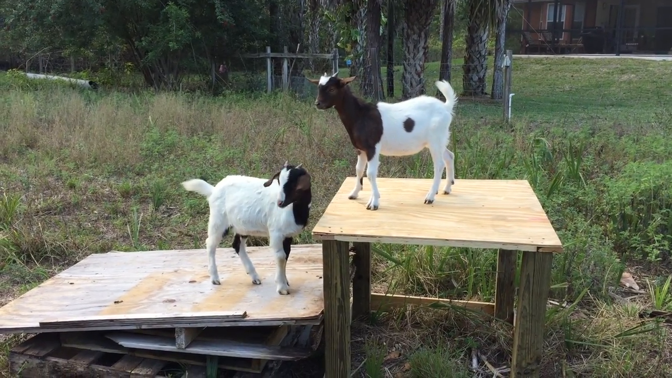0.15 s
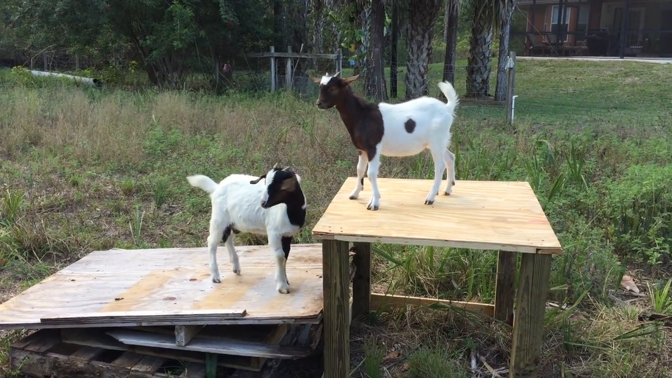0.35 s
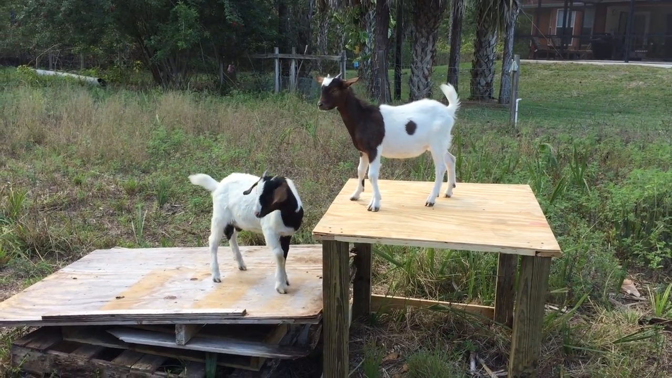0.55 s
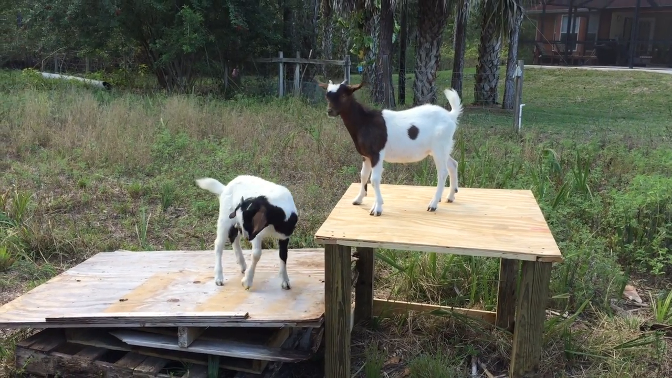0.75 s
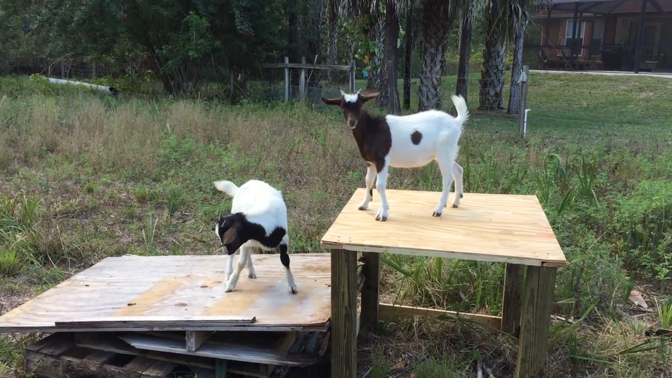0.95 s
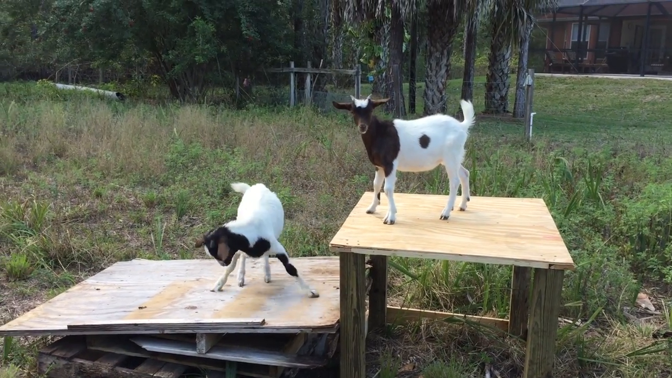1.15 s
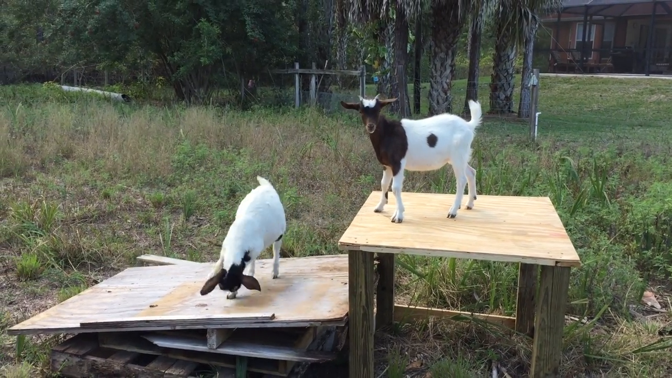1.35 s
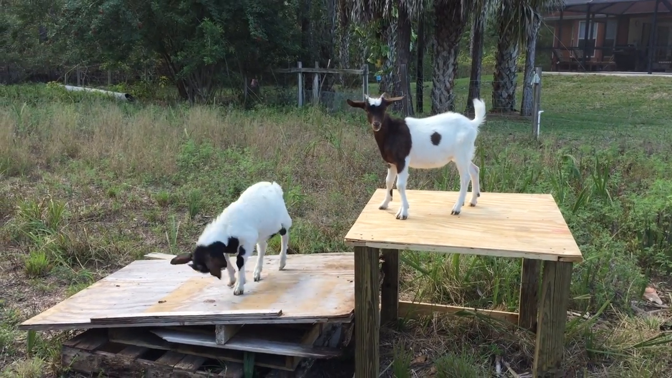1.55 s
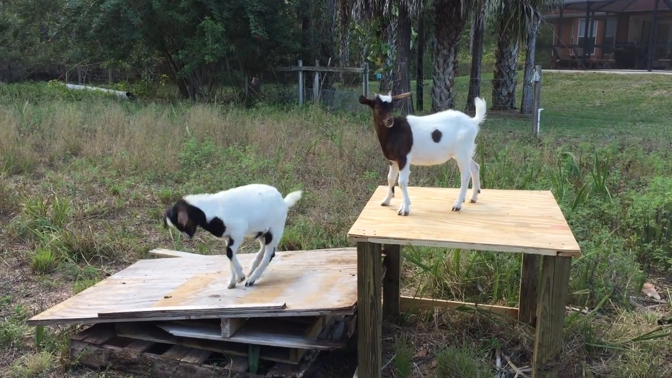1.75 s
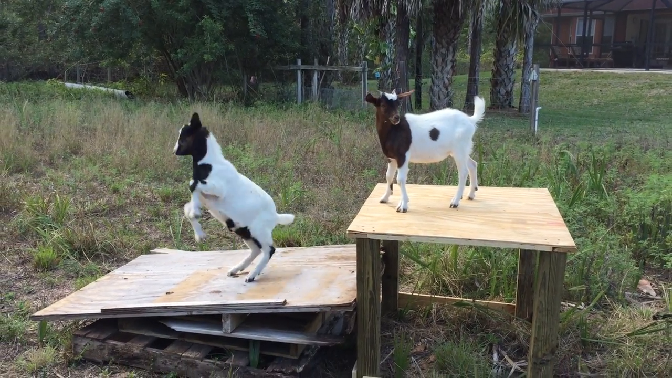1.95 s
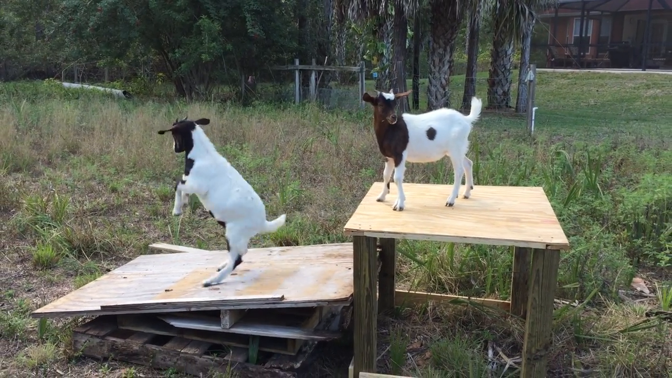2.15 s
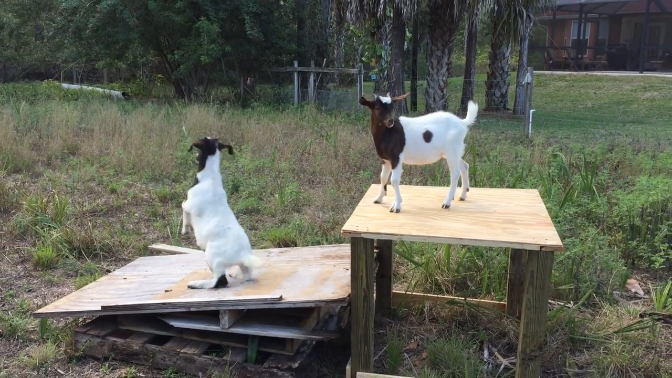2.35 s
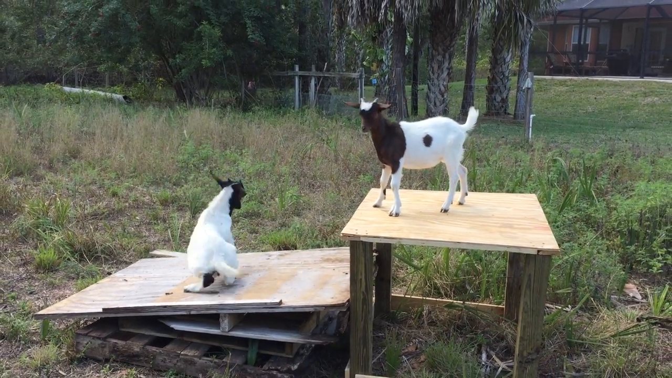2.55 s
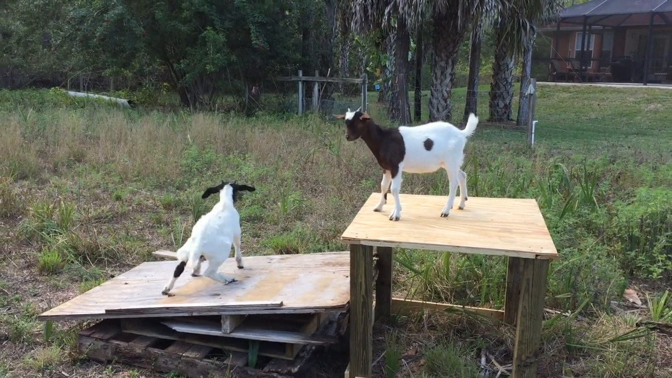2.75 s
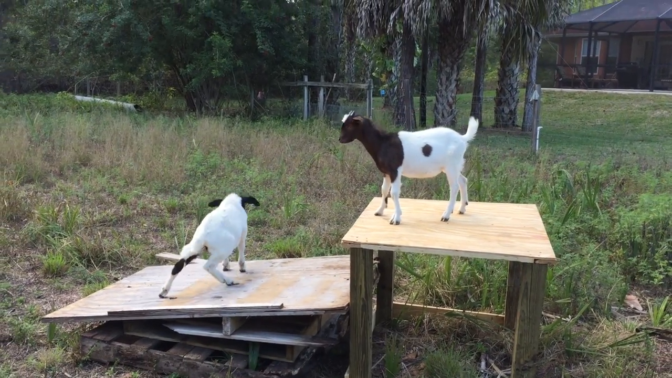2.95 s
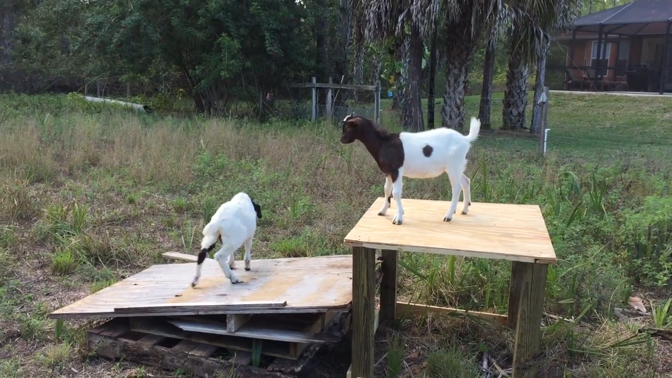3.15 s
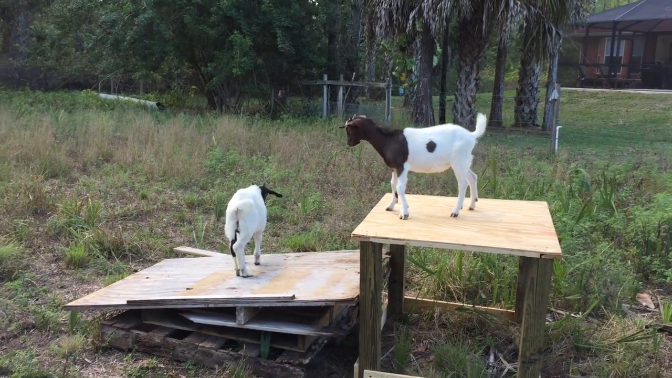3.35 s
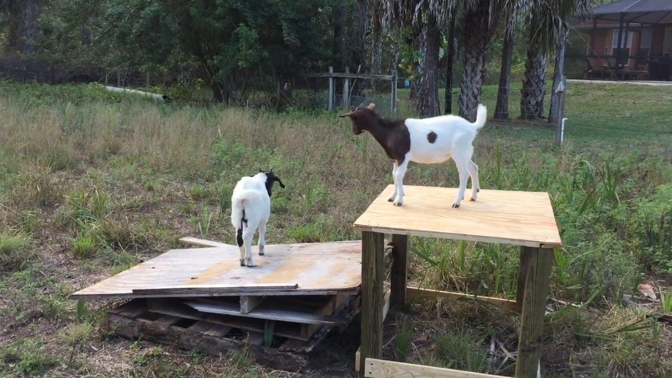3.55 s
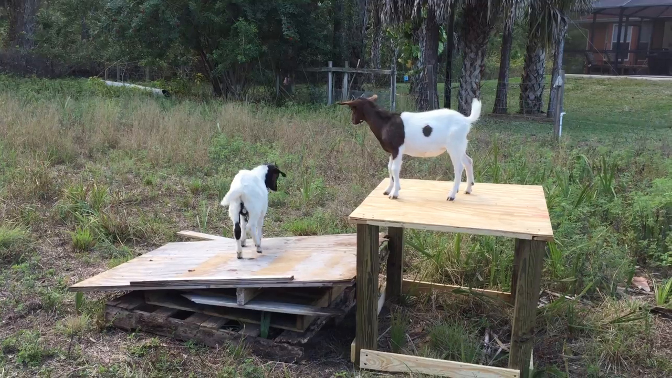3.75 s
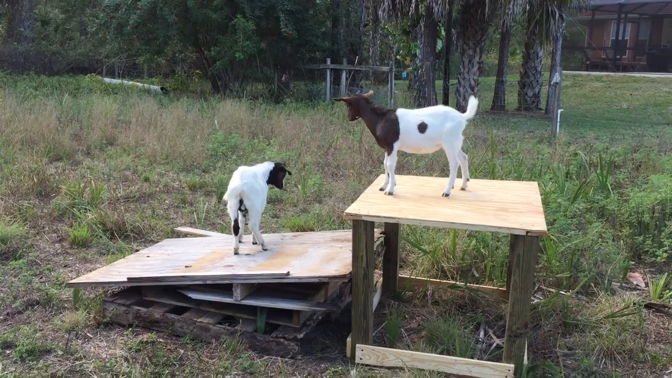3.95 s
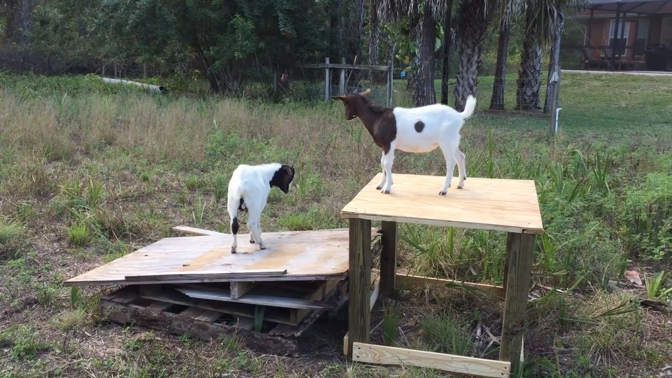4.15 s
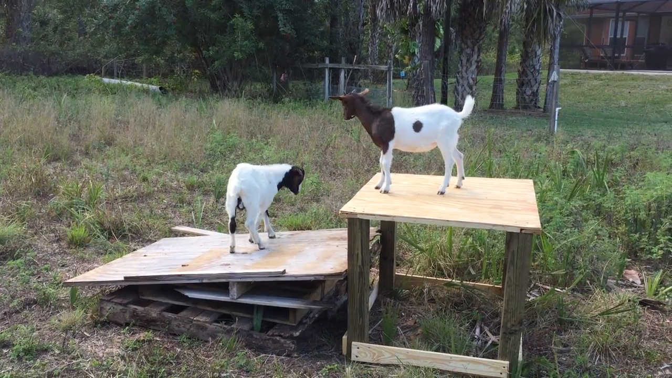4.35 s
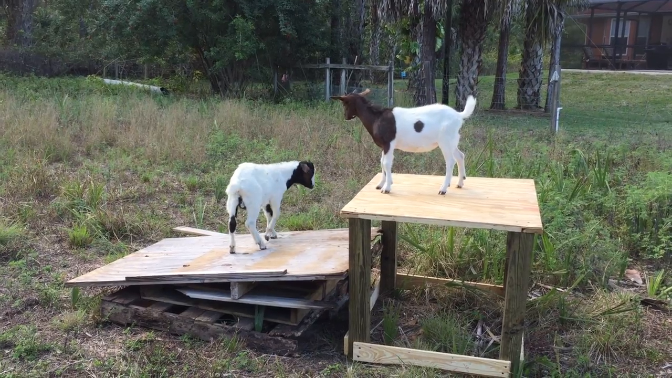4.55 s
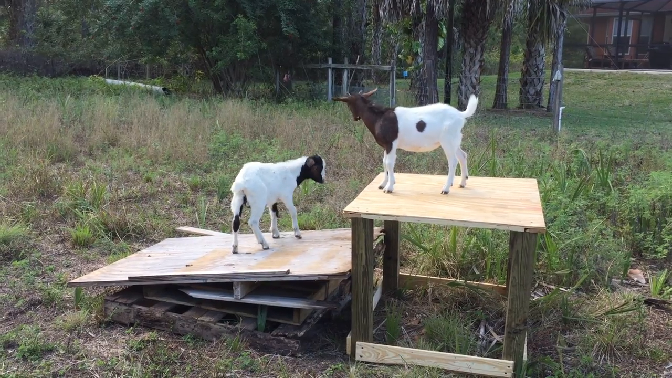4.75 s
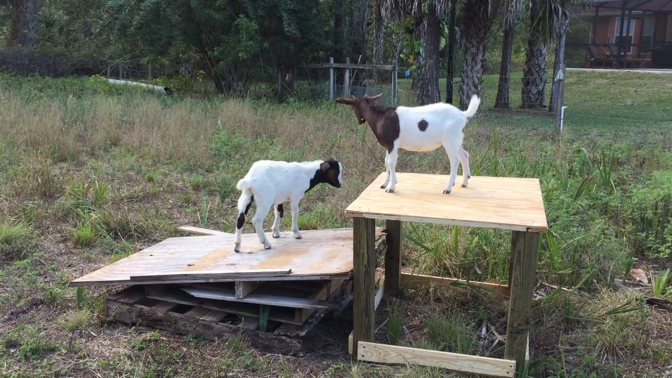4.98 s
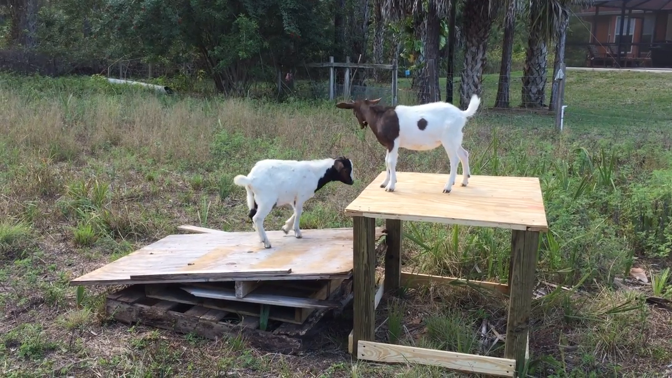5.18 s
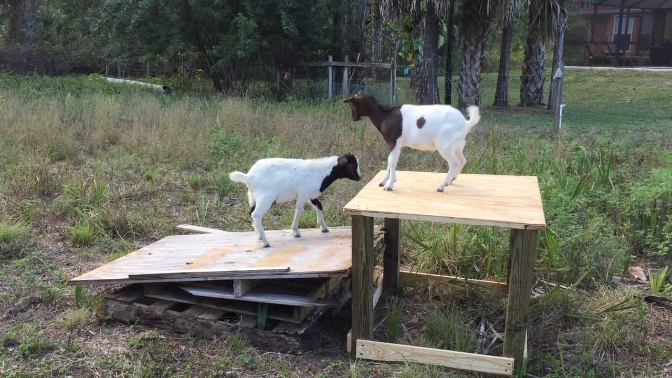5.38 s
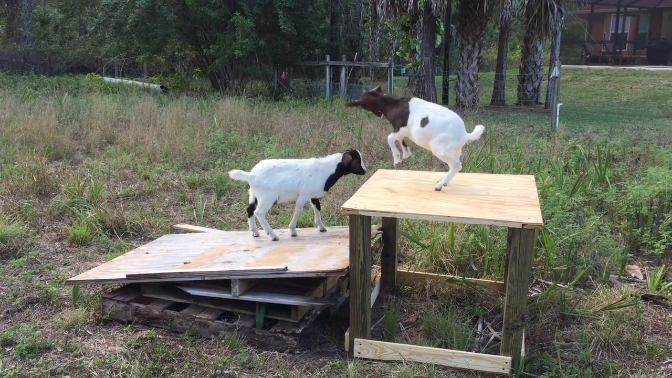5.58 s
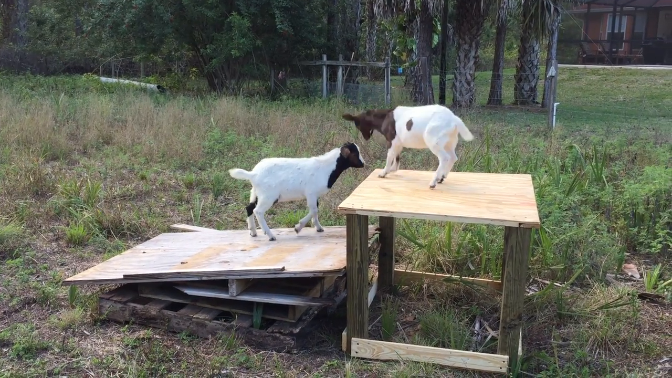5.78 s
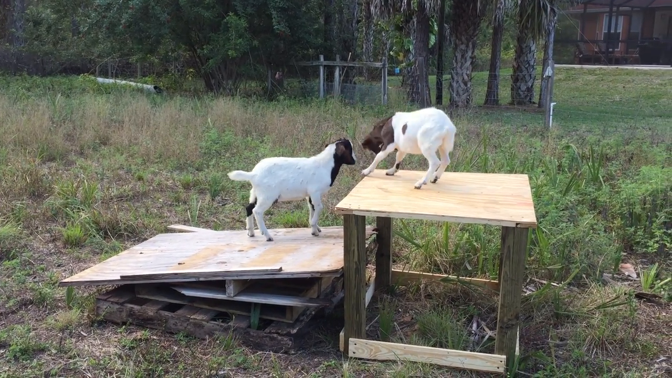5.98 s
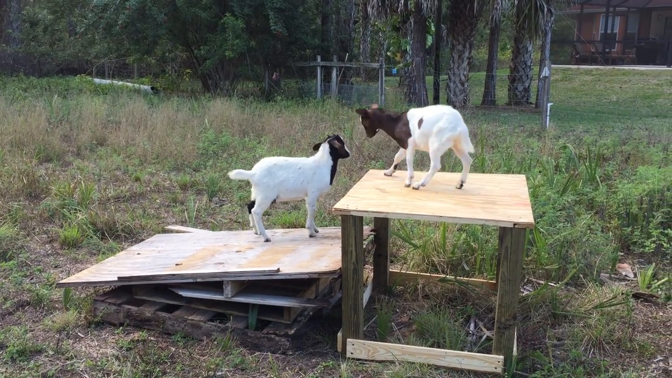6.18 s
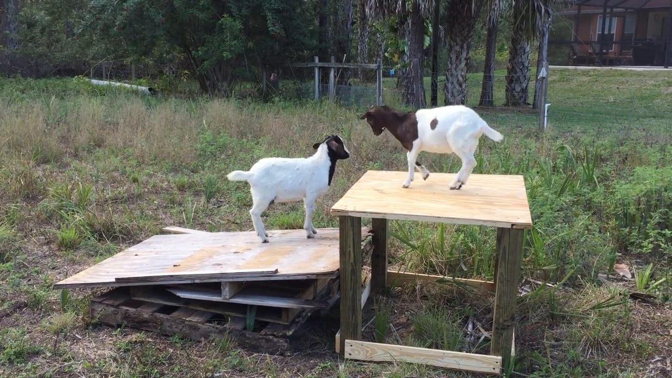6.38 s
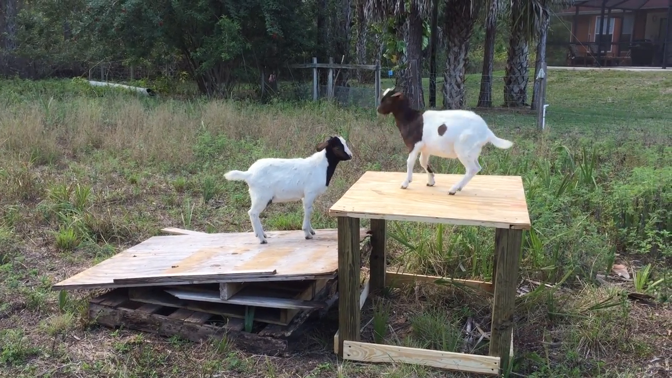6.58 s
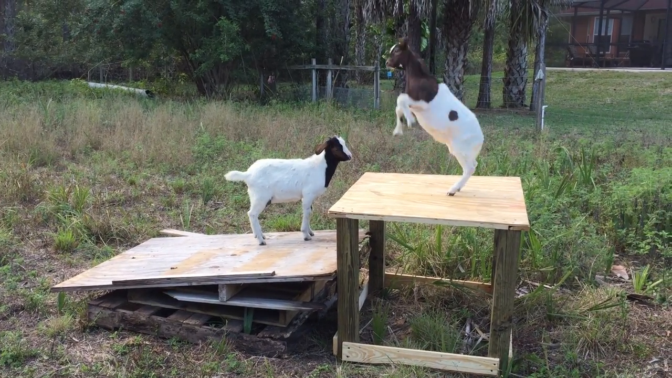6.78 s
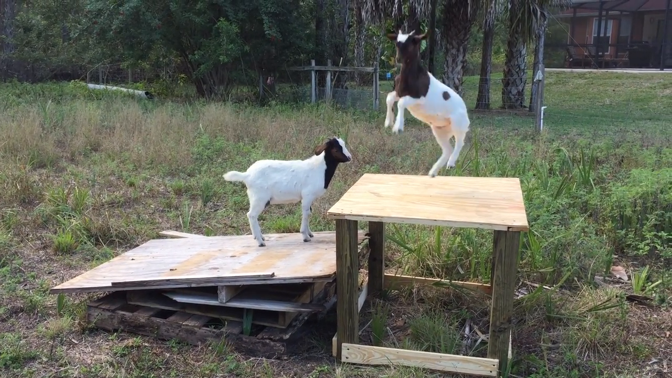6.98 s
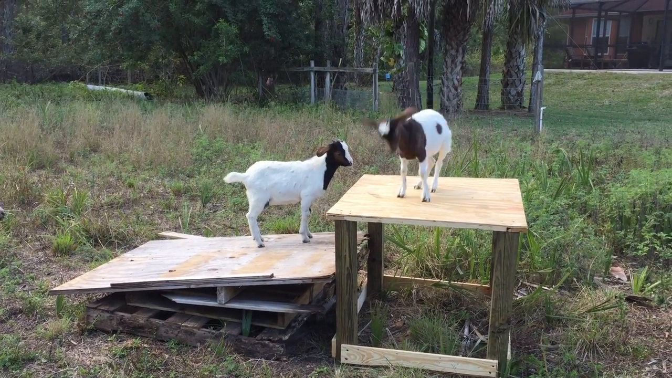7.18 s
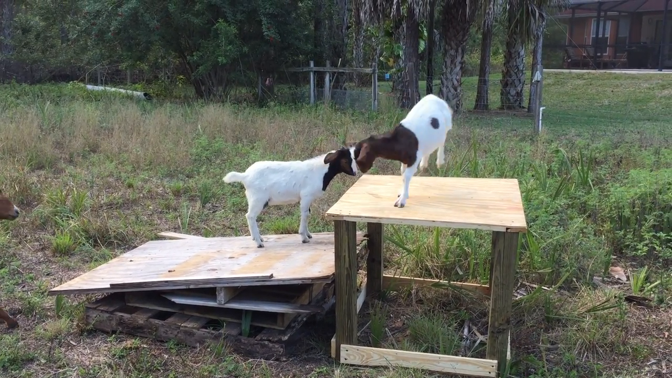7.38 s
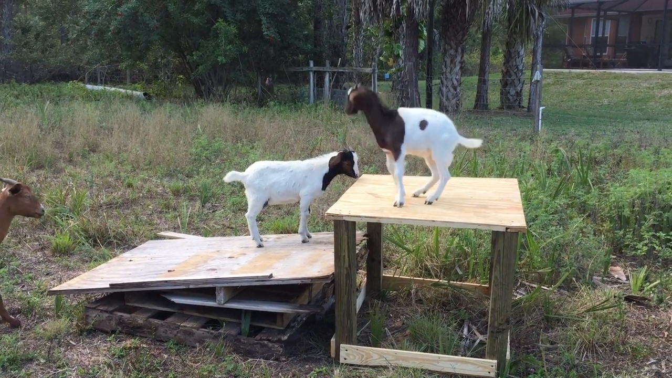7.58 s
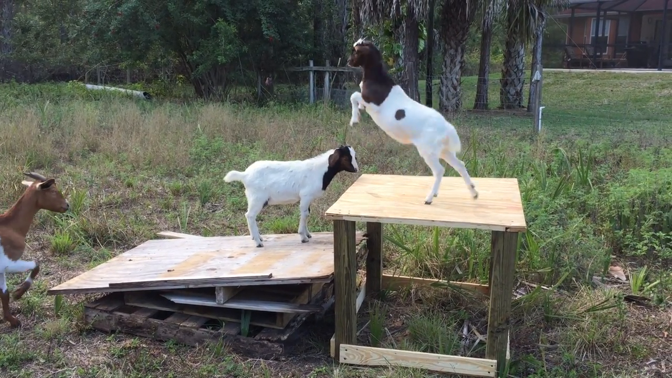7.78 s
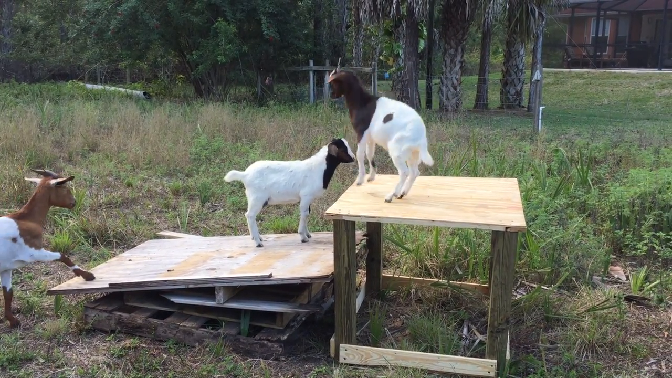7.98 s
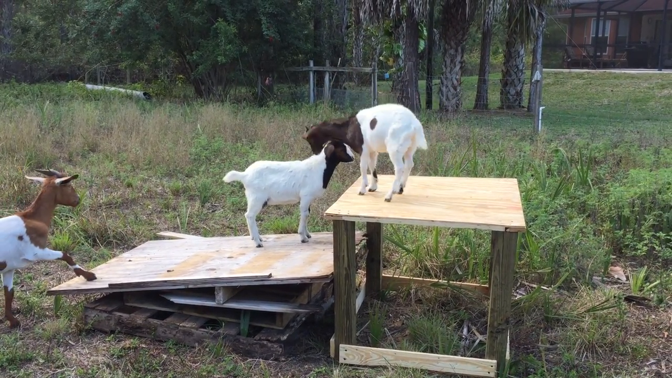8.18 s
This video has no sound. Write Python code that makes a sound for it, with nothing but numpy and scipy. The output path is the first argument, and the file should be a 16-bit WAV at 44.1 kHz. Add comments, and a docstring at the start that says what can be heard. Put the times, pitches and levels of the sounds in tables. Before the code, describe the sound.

Young goats move on plywood nearby, outdoors, over a faint hush and low rumble. Light hoof scuffs and ticks begin around 0.4 seconds, growing into rasping skids and knocks between 1 and 2 seconds. A distant dog barks once near 2 seconds. Sharp, gritty clicks at 2.2 seconds open a loud scramble lasting until about 3.1: hooves knock and scrape while a loose sheet thumps and slaps dully on pallets. Sparse, soft steps and scuffs follow, with a very faint bird whistling just after 5 seconds. From 5.4 seconds a second goat scrapes and stamps on a wooden table, with sharper cracks and hollow thumps clustered around 6 seconds. The far dog gives a lower bark at 6.3 seconds. More knocks come at 6.6, a strong cluster around 7.3, a few more up to 7.7, and a last quick clatter just after 8 seconds.

```python
"""A grassy yard, where two young goats play on plywood. One skids and scrambles on a loose sheet
laid over pallets; the other rears and stamps on a table. Each hoof clicks, knocks and makes its
board thump; skids rasp, grit and hoof edges tick and the loose sheet slaps. Far off, a dog barks
twice into the trees and a small bird calls, over a bed of outdoor hush and low rumble."""
import sys
import numpy as np
from scipy import signal
from scipy.fft import rfft, irfft, next_fast_len
from scipy.io import wavfile

SR = 44100
rng = np.random.default_rng(int(sys.argv[2]) if len(sys.argv) > 2 else 0)


def persist_wave(psi):
    """Save psi, clipped to +-1, as 16-bit WAV."""
    counts = np.round(np.clip(psi, -1, 1) * 32767).astype(np.int16)
    wavfile.write(sys.argv[1], SR, np.atleast_2d(counts).T)


N = 362943
TIME = np.arange(N) / SR
RING = np.arange(int(.45 * SR)) / SR  # time axis of one hit or skid
KNOCK_HZ, CLACK_HZ, CLICK_HZ, CUTOFF_HZ = 450, 1100, 2800, 15400  # band edges of the wood sounds


def from_db(db):
    """Decibels to gain."""
    return 10 ** (np.asarray(db) / 20)


def rms_one(x):
    """Scale to rms 1."""
    return x / np.sqrt(np.mean(x ** 2) + 1e-20)


def at_hz(points, hz):
    """Read a curve on a log-frequency axis."""
    points_hz, values = np.transpose(points)
    return np.interp(np.log(np.maximum(hz, 1)), np.log(points_hz), values)


def add(out, start_s, sound):
    """Mix a sound in at a given time."""
    i = int(start_s * SR)
    out[i:i + len(sound)] += sound[:N - i]


def band(x, low_hz, high_hz, order=2):
    """Causal band-pass."""
    edges_hz = [low_hz, min(high_hz, SR / 2 - 1000)]
    return signal.sosfilt(signal.butter(order, edges_hz, "band", fs=SR, output="sos"), x)


def coloured(x, spectrum):
    """Shape a steady sound with an EQ curve; rms 1."""
    size = next_fast_len(N)
    gain = from_db(at_hz(spectrum, np.fft.rfftfreq(size, 1 / SR)))
    return rms_one(irfft(rfft(x, size) * gain, size)[:N])


def drift(per_s):
    """Random modulation, gliding between values of spread 1."""
    knots = rng.standard_normal(4000)
    return np.interp(TIME * per_s, np.arange(len(knots)), knots)


def echoes(x, t60_s, build_s, low_hz, high_hz):
    """Diffuse scatter from trees and buildings: a noise tail with unit energy."""
    t = TIME[:2 * SR]
    noise = band(rng.standard_normal(len(t)), low_hz, high_hz)
    tail = noise * from_db(-60 * t / t60_s) * (1 - np.exp(-t / build_s))
    return signal.fftconvolve(x, tail / np.sqrt(np.sum(tail ** 2)))[:N]


# EQ of the outdoor hush: frequency_hz, gain_db
HUSH_EQ = [(25, -7), (65, -2.5), (95, 4.5), (140, -9.5), (280, -15), (900, -19), (2400, -23), (8000, -31)]
def outdoor_bed():
    """An even hush and a distant rumble that slowly swells and sinks."""
    rumble = from_db(-67 + 2 * drift(per_s=1.1)) * rms_one(band(rng.standard_normal(N), 60.4, 72.5))
    return from_db(-65.5) * coloured(rng.standard_normal(N), HUSH_EQ) + rumble


# bird whistles: start_s, length_s, end_pitch_hz, top_pitch_hz, level_db (before the flutter)
WHISTLES = [(5.07, .08, 2900, 3530, -80), (5.3, .018, 4200, 4350, -78), (5.375, .08, 2900, 3530, -78)]
def bird():
    """Thin whistles that arch up and back in pitch and flutter in level."""
    out = np.zeros(N)
    for start_s, length_s, end_hz, top_hz, level_db in WHISTLES:
        arch = np.sin(np.linspace(0, np.pi, int(length_s * SR)))
        phase = 2 * np.pi * np.cumsum(end_hz + (top_hz - end_hz) * arch) / SR
        add(out, start_s, from_db(level_db) * rms_one(np.sin(phase) * np.abs(arch) ** 0.11))
    return out * from_db(9 * drift(per_s=120))


# formants of the dog's throat: centre_hz, width_hz, gain_db
DOG_FORMANTS = [(376, 120, 2.5), (620, 56, 4.5), (1090, 85, 0.5), (1850, 300, -17)]
# barks: start_s, length_s, start_pitch_hz, end_pitch_hz, level_db (before the echo mix), roughness
DOG_BARKS = [(1.947, 0.096, 720, 637, -46, 0.37), (6.325, 0.1135, 211.1, 188.8, -44.5, 0.56)]
def dog():
    """Rough, falling harmonics pass through the throat and trail off in the trees."""
    out = np.zeros(N)
    for start_s, length_s, start_hz, end_hz, level_db, roughness in DOG_BARKS:
        progress = np.linspace(0, 1, int(length_s * SR))
        phase = 2 * np.pi * np.cumsum(start_hz + (end_hz - start_hz) * progress) / SR
        buzz = rms_one(sum(np.cos(k * phase) for k in np.arange(1, 10)))
        folds = buzz + 4 * roughness * rng.standard_normal(N)[:len(progress)]
        voice = sum(from_db(db) * band(folds, hz - width / 2, hz + width / 2, order=1)
                    for hz, width, db in DOG_FORMANTS)
        bark = rms_one(band(voice, 290, 1180) * np.sin(np.pi * progress))
        add(out, start_s, from_db(level_db) * bark)
    trees = echoes(out, t60_s=0.89, build_s=0.032, low_hz=450, high_hz=1520)
    return from_db(-4.5) * out + from_db(-14) * trees


# EQ of a hoof rubbing on plywood: frequency_hz, gain_db
FRICTION_EQ = [(80, 1), (145, 2), (200, -7), (350, -6), (550, -9), (850, -7), (1650, -6.5), (2850, -19),
               (4300, -18.5), (6200, -16.5), (7500, -26), (9500, -30.5), (10500, -38), (15000, -36)]
def friction_noise(low_hz):
    """The steady brush of hoof on wood; rms 1."""
    return rms_one(band(coloured(rng.standard_normal(N), FRICTION_EQ), low_hz, CUTOFF_HZ))


def shuffling():
    """Faint soft brushes as the goats shift their weight."""
    touches = (rng.random(N) < 10 / SR) * rng.random(N)
    pressure = signal.fftconvolve(touches, np.hanning(SR // 20), "same")
    return from_db(-86.5) * rms_one(pressure * friction_noise(KNOCK_HZ))


# ticks of grit and hoof edges: start_s, peak_db
TICKS = [(0.36, -43.5), (0.484, -59), (0.6735, -44), (0.743, -47), (1.022, -35.5), (2.129, -39),
         (2.173, -46), (2.2214, -47), (2.2373, -29), (2.2448, -22.5), (2.2581, -22.5), (2.274, -36),
         (2.848, -40), (5.374, -39.5), (5.4926, -36.5), (6.0225, -43)]
def ticks(t60_s=0.0074):
    """Short bright ticks of grit and of a hoof edge catching; the loud ones ring near 5 kHz."""
    out = np.zeros(N)
    for start_s, peak_db in TICKS:
        snap = rng.standard_normal(len(RING)) * from_db(-60 * RING / t60_s)
        ring = from_db(1.54 * (peak_db + 32.5)) * band(snap, 4150, 6500)
        tick = band(snap, 3000, 14200) + ring
        add(out, start_s, from_db(peak_db) * tick / np.abs(tick).max())
    return out


def grain_catches(per_s, spread_db, clump_db):
    """A hoof edge catches on the wood grain at random, in clumps of uneven size."""
    caught = rng.random(N) < per_s / SR
    sizes = from_db(spread_db * np.minimum(rng.exponential(1, N), 4) + clump_db * drift(per_s=90))
    return caught * sizes * rng.choice([-1, 1], N)


def wood_ring(catches, t60_s, block=1500):
    """Each catch rings briefly in the board, with a colour that changes as the hoof moves on."""
    out, t = np.zeros(N), RING[:4 * block]
    for i in range(0, N, block):
        response = rms_one(rng.standard_normal(len(t)) * from_db(-60 * t / t60_s))
        add(out, i / SR, signal.fftconvolve(catches[i:i + block], response))
    return coloured(out, FRICTION_EQ)


# hoof skids: start_s, length_s, rasp_db, swell_db, rumble_db, hiss_db (last two relative to the rasp)
HOOF_SKIDS = [(0.359, 0.12, -55, 0.5, -4.5, -3.5), (0.624, 0.059, -58, -6, -6, -7),
              (0.714, 0.13, -76, -12, 0, 4.5), (1.004, 0.15, -54, -1, 1, -0.5),
              (1.1, 0.081, -44.5, 2, -6, -8), (1.188, 0.11, -52, 4, -2, -5),
              (1.281, 0.23, -48, 0.5, 3, -3.5), (1.508, 0.12, -54.5, 2.5, 2, -7),
              (1.606, 0.082, -61, 7, 3, 1), (1.888, 0.026, -46.5, 5, -2, -7.5),
              (1.938, 0.027, -41, -6, -2, -8.5), (2.197, 0.06, -38.5, 4.5, -7, -5),
              (2.261, 0.17, -50.5, -19, 3.5, -6), (2.426, 0.077, -46, 8, 5, -1),
              (2.515, 0.089, -56, -15, 10.5, -9), (2.671, 0.27, -46, -4, 2, -11),
              (2.919, .22, -51, -9, -3.5, -12.5), (3.154, 0.15, -60.5, -12, -7, -13),
              (3.285, 0.065, -55.5, 5, -12, -3.5), (3.605, 0.094, -70.5, 1, -11, -2),
              (4.092, 0.047, -62, 7, -1, -10), (4.613, .06, -70, -6, 0, -3),
              (5.128, 0.072, -65.5, 8.5, -5, -7), (5.45, 0.18, -51, 7, 0.5, -6.5),
              (5.625, 0.085, -49.5, -2, -13, -6.5), (5.841, 0.029, -60, 9, -6, -6.5),
              (5.96, 0.15, -71, -19, 6, 8.5), (6.385, 0.064, -57.5, 20, -3, -12.5),
              (6.977, 0.03, -60.5, 0, -9, -1.5), (7.303, 0.077, -53, -5, 4.5, -1.5),
              (7.435, 0.036, -65.5, 13, -8, -4), (7.821, 0.11, -56, 26.5, -20, 1.5),
              (7.957, 0.028, -44.5, -4, -58, -3)]
def skids(bite_s=0.024):
    """Hooves stick and slip: they rasp, hiss and shake the board, which rumbles on a little longer."""
    def envelope(offsets_db, release_s):
        """Each skid bites, swells or fades evenly along its length, and lets go."""
        power = np.zeros(N)
        for (start_s, length_s, rasp_db, swell_db, *_), offset_db in zip(HOOF_SKIDS, offsets_db):
            bite = np.minimum(RING / bite_s, 1)
            hold = from_db(rasp_db + offset_db + swell_db * (np.minimum(RING / length_s, 1) - .5))
            release = np.exp(-np.maximum(RING - length_s, 0) / release_s)
            add(power, start_s, (bite * hold * release) ** 2)
        return np.sqrt(power)

    *_, rumble_db, hiss_db = np.transpose(HOOF_SKIDS)
    catches = grain_catches(per_s=3200, spread_db=1.5, clump_db=4)
    rumble = band(wood_ring(catches, t60_s=0.14), 105, KNOCK_HZ, order=3)
    rasp = band(wood_ring(catches, t60_s=0.026), KNOCK_HZ, CLICK_HZ, order=3)
    judder = from_db(drift(per_s=40))
    # the hiss leaves the contact directly, without ringing
    hiss = band(coloured(catches, FRICTION_EQ), CLICK_HZ, CUTOFF_HZ, order=3)
    return (envelope(rumble_db, release_s=0.016) * rms_one(rumble)
            + envelope(np.zeros(len(HOOF_SKIDS)), release_s=0.015) * rms_one(rasp * judder)
            + envelope(hiss_db, release_s=0.015) * rms_one(hiss))


def nearness(hz, pitches_hz, octaves):
    """How close each mode lies to the pitch of each hit, 0-1."""
    return np.exp(-(np.log2(hz / pitches_hz[:, None]) / octaves) ** 2)


def strike(hz, t60_s, weights, rise_s, crack):
    """Ring a set of modes, one row of weights per hit; each hit has rms 1 over its first 30 ms."""
    decay = from_db(-60 * RING / t60_s[:, None])
    angle = 2 * np.pi * hz[:, None] * RING
    hits = weights.real @ (decay * np.sin(angle)) + weights.imag @ (decay * np.cos(angle))
    attack = 1 - np.exp(-(RING / rise_s) ** 2)
    # the struck spot radiates strongly before the waves spread through the board
    punch = 1 + crack * np.exp(-RING / (4 * rise_s))
    hits = hits * attack * punch
    return hits / np.sqrt(np.mean(hits[:, RING < .03] ** 2, axis=1, keepdims=True))


# EQ of a hit on plywood: frequency_hz, gain_db
HIT_EQ = [(450, -9), (560, -5.5), (720, -11.5), (1080, -8), (1350, 0), (1950, -6), (2830, -15), (3800, -13),
          (4700, -13), (5700, -8), (7000, -26.5), (10300, -41.5), (12500, -38.5), (15500, -56)]
# ring time of the higher wood modes: frequency_hz, t60_s
WOOD_DECAY = [(450, 0.14), (900, 0.085), (1500, 0.061), (3000, 0.065), (5500, 0.018), (12000, 0.088)]
def wood_modes(crack, low_hz, high_hz, rise_s, count, focus_hz=None):
    """Crowded higher modes: every landing spot excites them with its own strengths and phases."""
    hz = low_hz + (high_hz - low_hz) * (np.arange(count) + .5 * rng.random(count)) / count
    strength, phase = np.moveaxis(rng.standard_normal((len(crack), count, 2)), 2, 0)
    # a pitched knock is a narrow cluster of boosted modes
    focus_db = 0 if focus_hz is None else 27 * nearness(hz, focus_hz, octaves=0.19)
    weights = from_db(at_hz(HIT_EQ, hz) + 5.3 * strength + focus_db) * np.exp(2j * np.pi * phase)
    return strike(hz, at_hz(WOOD_DECAY, hz), weights, rise_s, crack)


def board_hits(hits, modes, focus_db, focus_octaves, swell_s, crack_db, body_db, knock_db, click_db):
    """The contact clicks first; slow bending waves follow as a knock and a thump."""
    starts_s, thump_hz, knock_hz, strength_db, hardness_db = np.transpose(hits)
    mode_hz, mode_db, t60_s = np.transpose(modes)
    # layer levels in dB: a hard contact moves energy from the thump to the clack and click
    thump, clack = strength_db - hardness_db / 2, strength_db + hardness_db / 2
    # off the middle of the board (266 Hz), a hit thumps higher and knocks more hollowly
    hollow = strength_db + 4.5 * np.log2(thump_hz / 266)
    body, knock = hollow + body_db, hollow + knock_db
    # a hit heavier than an ordinary step (-45 dB) clicks more brightly
    click = clack + click_db + 0.2 * (strength_db + 45)
    # the landing spot favours the modes near one pitch
    favoured = nearness(mode_hz, thump_hz, focus_octaves)
    weights = from_db(mode_db + focus_db * favoured) * np.exp(2j * np.pi * rng.random(favoured.shape))
    # a hard tip, with more click than knock, gives a louder crack
    crack = from_db(crack_db + click - knock)[:, None]
    layers = [(thump, strike(mode_hz, t60_s, weights, rise_s=swell_s, crack=0.54)),
              (body, wood_modes(crack, KNOCK_HZ, CLACK_HZ, rise_s=0.0018, count=13)),
              (knock, wood_modes(crack, KNOCK_HZ, CLICK_HZ, rise_s=0.00059, count=48, focus_hz=knock_hz)),
              (clack, wood_modes(crack, CLACK_HZ, CLICK_HZ, rise_s=0.00033, count=40)),
              (click, wood_modes(crack, CLICK_HZ, CUTOFF_HZ, rise_s=0.00015, count=130))]
    sounds = sum(from_db(db)[:, None] * layer for db, layer in layers)
    out = np.zeros(N)
    for start_s, sound in zip(starts_s, sounds):
        add(out, start_s, sound)
    return out


# bending modes of the loose sheet: pitch_hz, gain_db, t60_s
SHEET_MODES = [(66, -9, 0.46), (91.6, -7.5, 1), (110.8, -12, 0.21), (149.3, -4, 0.29), (192.8, -11, 0.51),
               (218.3, -0.5, 0.17), (264.8, 2, 0.12), (295, 3.5, 0.054), (350.6, 2, 0.072), (417, -2, 0.1)]
# slaps of the sheet: start_s, thump_hz, knock_hz, strength_db, hardness_db (clack over thump)
SLAPS = [(1.506, 302, 1550, -49.5, 5), (1.547, 223, 1380, -51.5, 9), (2.18, 202, 690, -49.5, -15.5),
         (2.296, 171, 700, -43, -12), (2.327, 146, 1680, -43, -5), (2.42, 180, 1650, -53, 1),
         (2.56, 145, 1650, -44.5, 1), (2.699, 228, 1710, -41.5, -8), (2.733, 207, 606, -36, -23.5),
         (2.747, 186, 650, -39, -1.5), (2.85, 264, 1660, -47.5, 8), (3.0, 178, 1650, -48.5, -12.5),
         (3.08, 295, 900, -46, -21), (3.224, 142, 1650, -57, 1)]
def sheet_slaps():
    """The loose sheet flexes and slaps the pallets, dull and with almost no click."""
    return board_hits(SLAPS, SHEET_MODES, focus_db=15, focus_octaves=0.47, swell_s=0.0031,
                      crack_db=-12, body_db=-3, knock_db=-10.5, click_db=-24)


# hooves landing on the sheet: start_s, thump_hz, knock_hz, strength_db, hardness_db
SHEET_STEPS = [(0.628, 386, 504, -62, 6.5), (0.936, 268, 540, -50.5, -5.5), (1.01, 141, 1800, -53.5, 10),
               (1.032, 144, 1670, -51.5, -3), (1.754, 164, 643, -45.5, -8), (2.219, 149, 570, -46, -9.5),
               (2.498, 336, 830, -39, -1.5), (2.6245, 334, 1380, -34.5, -8.5), (2.669, 246, 807, -33.5, -5),
               (2.893, 169, 920, -44.5, -5.5), (3.485, 336, 555, -53, 1.5), (3.54, 307, 1370, -64, -1),
               (3.846, 288, 1430, -73.5, -12), (4.093, 425, 550, -56, 6.5), (4.407, 260, 497, -53, -17),
               (4.913, 408, 536, -62.5, -9.5)]
def sheet_hooves():
    """One goat scrambles on the sheet: horn clicks on plywood over a quick, low thump."""
    return board_hits(SHEET_STEPS, SHEET_MODES, focus_db=12, focus_octaves=0.26, swell_s=0.0024,
                      crack_db=4, body_db=-4.5, knock_db=-4, click_db=-6.5)


def sheet_lead_ins(lead_s=0.028, gain_db=-5):
    """A short swell of friction noise leads into each hoof hit on the sheet."""
    swell = np.linspace(0, 1, int(lead_s * SR)) ** 2
    envelope = np.zeros(N)
    for start_s, *_, strength_db, hardness_db in SHEET_STEPS:
        add(envelope, start_s - lead_s, from_db(strength_db + hardness_db / 2 + gain_db) * swell)
    return envelope * friction_noise(CLACK_HZ)


# bending modes of the table top: pitch_hz, gain_db, t60_s
TABLETOP_MODES = [(73.3, -10, 0.79), (122.4, -9, 0.13), (168, 1.5, 0.12), (194, 3.5, 0.068),
                  (240.4, -1.5, 0.21), (269.8, 0.5, 0.13), (302, 5, 0.091), (341, 9, 0.058),
                  (394, 10, 0.046)]
# hooves landing on the table: start_s, thump_hz, knock_hz, strength_db, hardness_db
TABLE_STAMPS = [(5.373, 214, 1060, -49.5, -6.5), (5.494, 310, 690, -55, -16),
                (5.9225, 206, 810, -39.5, -9.5), (5.957, 340, 790, -37, -2.5), (6.037, 195, 1500, -41, 1),
                (6.097, 256, 1390, -63.5, -10), (6.173, 250, 2000, -71, 9), (6.31, 238, 900, -42, -2.5),
                (6.619, 277, 1350, -45, -4), (6.647, 270, 930, -53.5, -5), (6.97, 324, 615, -66.5, -21),
                (7.089, 254, 1420, -56.5, 12), (7.215, 226, 825, -40, -5.5), (7.244, 315, 510, -36, -8),
                (7.2995, 283, 770, -33.5, -7.5), (7.525, 208, 1430, -46.5, -9.5),
                (7.707, 360, 480, -41.5, -16), (7.721, 236, 484, -41, -17), (8.0765, 328, 673, -40, -16),
                (8.11, 247, 750, -39.5, -6.5), (8.138, 250, 600, -41.5, -4), (8.1718, 264, 1346, -37, 7)]
def table_hooves():
    """The other goat stamps on the table: a sharper crack, and a thump that blooms more slowly."""
    return board_hits(TABLE_STAMPS, TABLETOP_MODES, focus_db=10.5, focus_octaves=0.23, swell_s=0.0083,
                      crack_db=6.5, body_db=-4.5, knock_db=-1.5, click_db=-3)


def scene():
    """Mono mix: the goats up front with a little yard scatter, the dog, bird and bed behind."""
    impacts = sheet_hooves() + sheet_slaps() + table_hooves()
    goats = impacts + skids() + ticks() + shuffling() + sheet_lead_ins()
    yard = from_db(-22.5) * echoes(goats, t60_s=0.44, build_s=0.0012, low_hz=145, high_hz=6600)
    return (goats + yard + dog() + bird() + outdoor_bed())[None]


def record(dry):
    """The microphone drops the deepest bass; the top is cut steeply."""
    low_cut = signal.butter(2, 40, "high", fs=SR, output="sos")
    high_cut = signal.ellip(10, .1, 80, CUTOFF_HZ, fs=SR, output="sos")
    return signal.sosfilt(high_cut, signal.sosfilt(low_cut, dry))


dry = scene()
out = record(dry)
persist_wave(out)
```